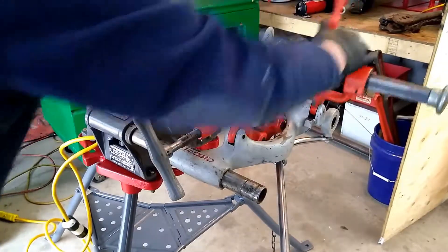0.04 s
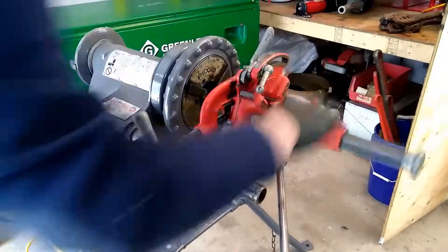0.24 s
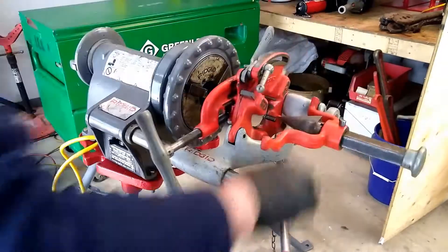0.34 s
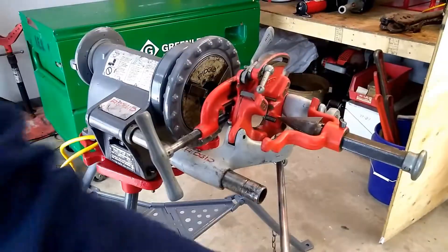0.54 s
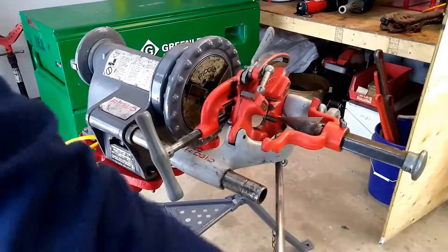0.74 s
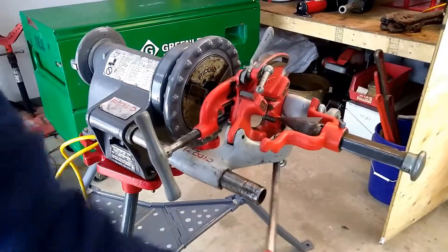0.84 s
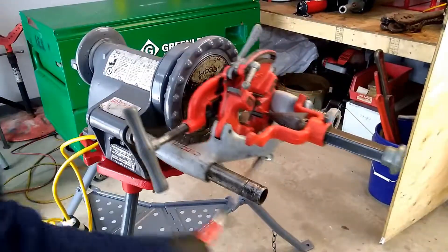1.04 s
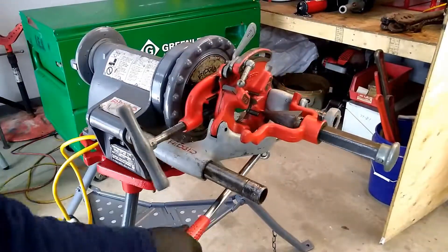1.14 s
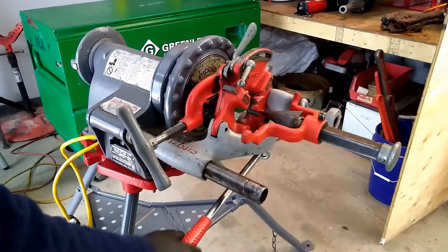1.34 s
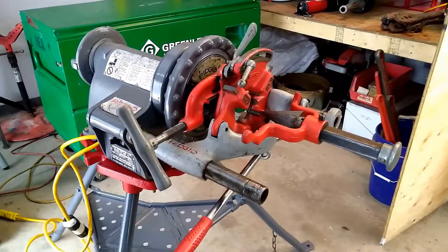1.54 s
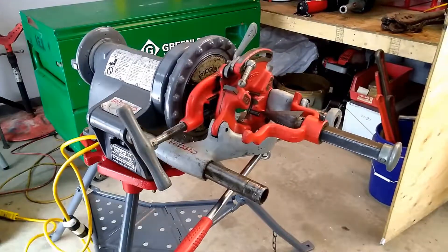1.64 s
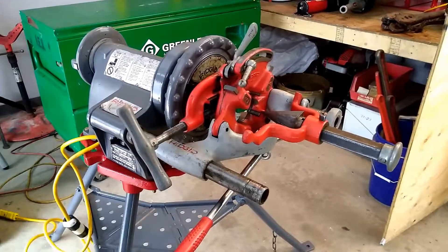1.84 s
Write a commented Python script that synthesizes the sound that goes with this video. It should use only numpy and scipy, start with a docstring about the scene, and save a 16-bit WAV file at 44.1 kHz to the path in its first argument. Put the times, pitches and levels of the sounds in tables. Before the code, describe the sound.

Metal parts of a pipe threading machine clank into place. An arm drops with a loud, chattering clank, the carriage knocks softly, then a lever lands with a duller clank. Each rings briefly in a small workshop with a humming fan.

```python
"""A small workshop with a humming fan, a two-port stereo microphone on a pipe threading machine.
The reamer arm is swung down and clanks onto its stop, chattering, then scuffs as it settles.
The carriage knocks softly; the feed lever drops with a duller clank and one rebound.
Each contact sets cast iron and steel ringing briefly, with a short room tail behind it.
Last, a sleeve brushes past as the hand lets go."""
import sys
import numpy as np
from scipy import signal
from scipy.fft import irfft
from scipy.io import wavfile
from scipy.ndimage import uniform_filter1d

SR = 44100
rng = np.random.default_rng(int(sys.argv[2]) if len(sys.argv) > 2 else 0)


def transcribe(u):
    """Save the signal u as a 16-bit wav file named by the first command-line argument.

    u: samples, shape (n,) or (channels, n), limited to [-1, 1]; the rate is SR.
    q: integer samples, one column per channel.
    """
    v = np.clip(np.atleast_2d(u).T, -1, 1)
    q = np.round(v * 32767).astype(np.int16)
    wavfile.write(sys.argv[1], SR, q)


N = 83790
T = np.arange(N) / SR
HZ = np.fft.rfftfreq(N, 1 / SR)

# Microphone, delay between the ports: (frequency [Hz], left lead [rad])
PORT_PHASE = [(100, 0), (560, -.4), (800, 0), (1450, 0), (1850, -2.6), (2400, -3.2), (3700, -6.3),
              (4900, -9.4), (6100, -13), (7350, -15.7), (8600, -19), (11000, -26), (14500, -31.5)]
# How alike the ports sound: (frequency [Hz], coherence [0-1])
PORT_COHERENCE = [(60, 0.38), (300, 0.41), (700, 0.69), (1150, 0.99), (1650, 0.6), (2350, 0.92),
                  (3200, 0.85), (3900, 0.73), (8400, .75), (15000, 0.17)]
# Stereo balance: (frequency [Hz], left minus right [dB])
PORT_BALANCE = [(150, -3.5), (550, .2), (1350, -1), (1600, -6.5), (2050, -6), (2400, -2.8), (15000, -3.2)]

# Spectra of the room tone and small noises: (frequency [Hz], relative density [dB])
FAN_COLOUR = [(52, -40.5), (75, -6), (98, -15.5), (125, -9.5), (200, -1.5), (290, -1), (400, 1.5),
              (560, -2), (1080, -1.5), (1400, -9), (1700, -7.5), (2300, -12.5), (3800, -24), (4900, -38.5),
              (15000, -46)]
HISS_COLOUR = [(100, -0.5), (4000, 9), (6000, -10.5), (9000, -4), (15000, -17)]
SLEEVE_COLOUR = [(1000, -11.5), (8500, 2), (14500, -4)]
SCUFF_COLOUR = [(300, -16.5), (1000, 1), (3700, -1.5), (5000, -15.5), (14500, -28)]
TICK_COLOUR = [(1000, -13), (3900, 2.5), (8300, 3), (14500, -8)]
# Motor hum in the fan noise: (frequency [Hz], relative level [dB])
FAN_HUM = [(120, -18), (194, -14), (408, -8), (657, -12)]
# Background ducking and recovering, as under a recorder's automatic gain: (time [s], level [dB])
BACKGROUND_LEVEL = [(0, -46.5), (.2, -43.5), (.35, -52), (.62, -52.5), (.88, -49.5), (1.02, -46.5),
                    (1.33, -46), (1.45, -42), (1.62, -42.5), (1.9, -37.5)]
# Light contacts around the clanks: (time [s], relative level [dB])
SCUFFS = [(0.2, -52), (0.529, -47), (0.608, -48), (0.675, -52.5)]
PINGS = [(0.2338, -21.5), (0.777, -36)]
TICKS = [(0.2442, -26.5), (1.0792, -30.5), (1.143, -29)]

# Decay of the room and of the metal's dense ringing: (frequency [Hz], t60 [s])
ROOM_T60 = [(60, 0.23), (300, 0.53), (1000, 0.55), (3500, 0.48), (7000, 0.43), (14000, 0.089)]
RING_T60 = [(60, 0.2), (300, 0.31), (800, 0.21), (3000, 0.28), (6000, 0.21), (14000, 0.21)]
# Contacts of each part: (time [s], relative level [dB], brightness [dB/octave])
ARM_HITS = [(0.2340, -10, -1), (0.2386, -10, 1.5), (0.2442, -5, 4.5), (0.2472, 0, -0.5), (0.2492, 2, 1.5),
            (0.2526, 0.5, 0), (0.262, -9.5, -3), (0.2688, -6, -2.5), (0.3718, -17.5, -0.5),
            (0.394, -23.5, -2.5)]
CARRIAGE_HITS = [(0.777, -4.5, -1.5), (0.7835, 1.5, 0), (0.7905, -11, -9.5), (0.8055, -16.5, 6)]
LEVER_HITS = [(1.0772, -13, -5), (1.0791, 1.5, -0.5), (1.0865, -5, -5.5), (1.102, -6, 0), (1.1145, -15, 1),
              (1.1432, -9, 0)]
# Dense ringing of each part: (frequency [Hz], relative density [dB])
ARM_COLOUR = [(40, -39), (130, -26.5), (300, -10), (510, -13.5), (620, -1.5), (1150, -3), (1420, -6),
              (1650, -2), (2350, 0.5), (3400, -4), (4300, -3), (5200, -13), (8400, -14.5), (11500, -20.5),
              (14500, -26)]
CARRIAGE_COLOUR = [(40, -45), (200, -9), (450, -12), (620, 1.5), (950, 0), (2200, -0.5), (3150, -3.5),
                   (4200, -5), (5300, -22.5), (8500, -21.5), (11500, -28.5), (15000, -39)]
LEVER_COLOUR = [(40, -43), (260, -18.5), (350, -10.5), (480, -13), (620, -2), (1000, -6), (1600, -7.5),
                (2450, -4), (3900, -6.5), (6300, -19), (8300, -21), (14500, -32)]
# Clear modes of each part: (frequency [Hz], relative level [dB], t60 [s])
ARM_MODES = [(604.4, 4, 0.3), (797, -8, 0.5), (943, 1.5, 0.29), (1094, -5, 0.56), (1418.5, -4.5, 0.3),
             (1597, 9, 0.13), (1663, -0.5, 0.32), (1905, 8.5, 0.12), (3020, 0, 0.22), (3154, -1.5, 0.2),
             (3215, 2.5, 0.088), (3314, -2.5, 0.25), (3370, -1, 0.17), (3670, -6.5, 0.12)]
CARRIAGE_MODES = [(585, 0, 0.18)]
LEVER_MODES = [(348.5, -12.5, 0.44), (601, -3, 0.41), (619, 5, 0.12), (933, 6, 0.16), (1126, -5.5, 0.22),
               (1986, 5, 0.18), (2398, 3, 0.39), (2810, 4, 0.037), (3056, -8, 0.35), (3750, -5.5, 0.22),
               (4460, -1.5, 0.15)]

ATTACK_S, CRACK_T60_S, ROOM_BUILD_S = 0.00075, 0.02, 0.015
RAGGED_DB, MODE_SPACING_HZ = 3, 32  # how unevenly the crowded upper modes stand out
WAVER_HZ, WAVER_S = 5, 0.012  # the loose parts rattle, so their modes waver


def amp(db):
    """Decibels to gain."""
    return 10 ** (np.asarray(db) / 20)


def unit_rms(x):
    """Scales to rms 1."""
    return x / np.sqrt(np.mean(x ** 2) + 1e-20)


def lookup(table, hz):
    """Reads a table on a log-frequency axis."""
    table_hz, values = np.transpose(table)
    return np.interp(np.log(hz + 1), np.log(table_hz + 1), values)


def mic_spectrum(colour):
    """Spectrum of coloured noise at rms 1, partly alike at the two ports."""
    a, b, c, d = rng.standard_normal((4, len(HZ)))
    left, unrelated = a + 1j * b, c + 1j * d
    coherence = np.clip(lookup(PORT_COHERENCE, HZ), 0, 0.99)
    right = coherence * left + np.sqrt(1 - coherence ** 2) * unrelated
    right *= np.exp(-1j * lookup(PORT_PHASE, HZ))
    lean = amp(lookup(PORT_BALANCE, HZ) / 2)
    spectrum = np.array([left * lean, right / lean]) * amp(lookup(colour, HZ))
    return spectrum / irfft(spectrum, N).std()


def mic_noise(colour):
    """Steady coloured noise at the microphone."""
    return irfft(mic_spectrum(colour), N)


def mic_tone(hz, zero_phase_s=0, waver_hz=0):
    """One partial, reaching each port with its own phase and level."""
    drift = unit_rms(uniform_filter1d(rng.standard_normal(N), round(WAVER_S * SR)))
    phase = 2 * np.pi * np.cumsum(hz + waver_hz * drift) / SR
    phase -= phase[round(zero_phase_s * SR)]
    lean = amp(lookup(PORT_BALANCE, hz) / 2)
    return np.array([np.sin(phase) * lean, np.sin(phase - lookup(PORT_PHASE, hz)) / lean])


def decay(power, t60):
    """Stored energy leaks away by 60 dB in t60 seconds."""
    return signal.lfilter([1], [1, -10 ** (-6 / (t60 * SR))], power + 1e-30)


def build_up(power, rise_s):
    """Energy builds up over a short time."""
    pole = np.exp(-1 / (rise_s * SR))
    return signal.lfilter([1 - pole], [1, -pole], power + 1e-30)


def contact_power(events, rise_s=ATTACK_S):
    """Each contact delivers one short pulse of power."""
    power = np.zeros(N)
    for time_s, db in events:
        power[round(time_s * SR)] += amp(db) ** 2
    return build_up(power, rise_s)


def room_tone():
    """A fan hums to the right over a thin hiss; it is heard ducked after the first clank."""
    hum = sum(amp(db) * mic_tone(hz) for hz, db in FAN_HUM)
    ducking = amp(np.interp(T, *np.transpose(BACKGROUND_LEVEL)))  # recovers slowly
    fan = (mic_noise(FAN_COLOUR) + hum) * ducking
    to_right = amp([[-0.5], [0.5]])
    return fan * to_right + amp(-64) * mic_noise(HISS_COLOUR)


def sleeve(peak_s=1.458, half_width_s=0.079):
    """Cloth slides softly as the hand lets go of the lever."""
    swell = 1 / (1 + ((T - peak_s) / half_width_s) ** 2)
    return amp(-63.5) * mic_noise(SLEEVE_COLOUR) * swell


def scuffs():
    """The loose arm rubs dully in its seat, on the way down and as it settles."""
    energy = decay(contact_power(SCUFFS, rise_s=0.006), t60=0.18)
    return mic_noise(SCUFF_COLOUR) * np.sqrt(energy)


def pings():
    """A small steel part rings at the first light touch of arm and carriage."""
    return mic_tone(hz=3120) * np.sqrt(decay(contact_power(PINGS), t60=0.041))


def ticks():
    """Steel edges meet with a sharp tick."""
    return mic_noise(TICK_COLOUR) * np.sqrt(decay(contact_power(TICKS), t60=0.013))


def hit_power(hits, hz):
    """Power the hits put in near one frequency; each contact has its own brightness."""
    octaves = np.log2(max(hz, 500) / 2000)
    return contact_power([(time_s, db + brightness * octaves) for time_s, db, brightness in hits])


def dense_ring(hits, colour, crack_db, room_db):
    """Band by band, each contact cracks, rings the casting's crowded modes and fills the room."""
    grid_hz = np.arange(0, SR / 2, MODE_SPACING_HZ)
    ragged = np.interp(HZ, grid_hz, rng.standard_normal(len(grid_hz)))
    ragged *= np.clip(HZ / 4000, 0, 1.3)  # smoother in the bass
    spectrum = mic_spectrum(colour) * unit_rms(amp(RAGGED_DB * ragged))
    centres_hz = np.geomspace(80, 14000, 12)
    sound = np.zeros((2, N))
    for hz, this_band in zip(centres_hz, np.eye(len(centres_hz))):
        band_gain = np.interp(np.log(HZ + 1), np.log(centres_hz), this_band)
        power = hit_power(hits, hz)
        ring = decay(power, lookup(RING_T60, hz))
        crack = amp(crack_db) ** 2 * decay(power, CRACK_T60_S)
        room = amp(room_db) ** 2 * build_up(decay(power, lookup(ROOM_T60, hz)), ROOM_BUILD_S)
        sound += irfft(spectrum * band_gain, N) * np.sqrt(ring + crack + room)
    return sound


def clank(hits, colour, modes, dense_db, modes_db, crack_db, room_db):
    """A part chatters on its stop: clear, wavering modes sound through the dense ringing."""
    sound = amp(dense_db) * dense_ring(hits, colour, crack_db, room_db)
    hardest_s = max(hits, key=lambda hit: hit[1])[0]
    for hz, db, t60 in modes:
        envelope = np.sqrt(decay(hit_power(hits, hz), t60))
        sound += amp(modes_db + db) * mic_tone(hz, hardest_s, WAVER_HZ) * envelope
    return sound


def scene():
    """Arm, carriage and lever in turn, in front of the workshop's room tone."""
    arm = clank(ARM_HITS, ARM_COLOUR, ARM_MODES,
                dense_db=-18.5, modes_db=-34.5, crack_db=9, room_db=-6.5)
    carriage = clank(CARRIAGE_HITS, CARRIAGE_COLOUR, CARRIAGE_MODES,
                     dense_db=-42, modes_db=-49, crack_db=5.5, room_db=-5)
    lever = clank(LEVER_HITS, LEVER_COLOUR, LEVER_MODES,
                  dense_db=-25.5, modes_db=-35, crack_db=6.5, room_db=-7)
    return arm + carriage + lever + pings() + ticks() + scuffs() + room_tone() + sleeve()


def record(dry):
    """The microphone chain rounds off the loudest peaks, then cuts the top treble."""
    rounded = dry / (1 + dry ** 8) ** (1 / 8)
    lowpass = signal.firwin(255, cutoff=15200, window=("kaiser", 9), fs=SR)
    return signal.oaconvolve(rounded, lowpass[None], "same")


dry = scene()
out = record(dry)
transcribe(out)
```